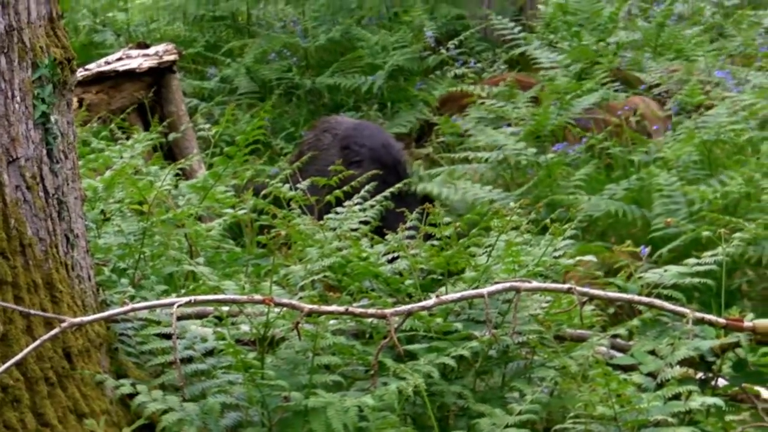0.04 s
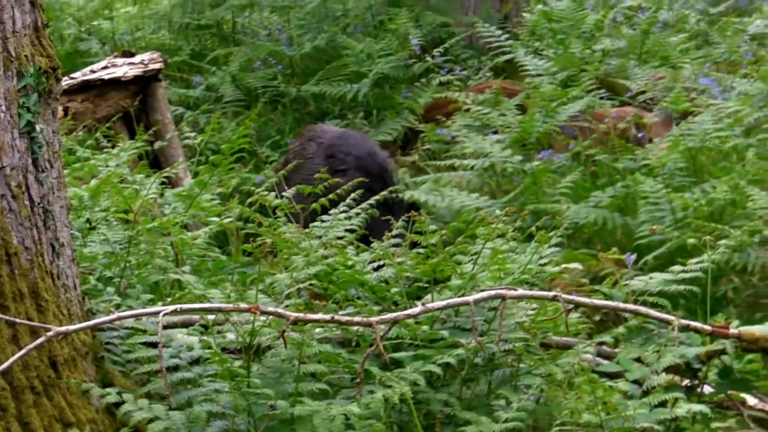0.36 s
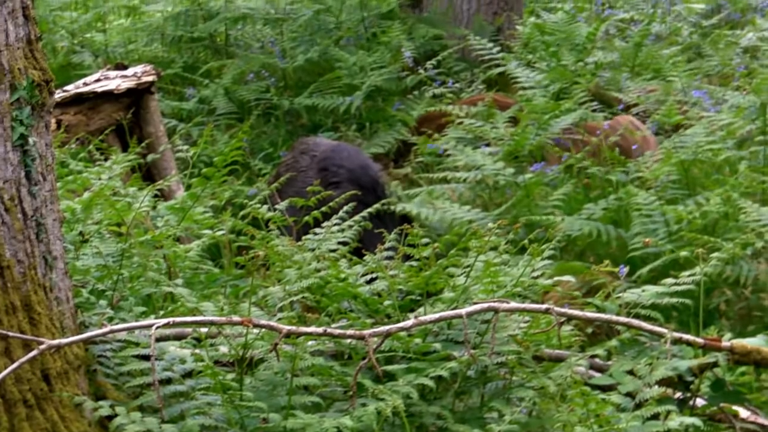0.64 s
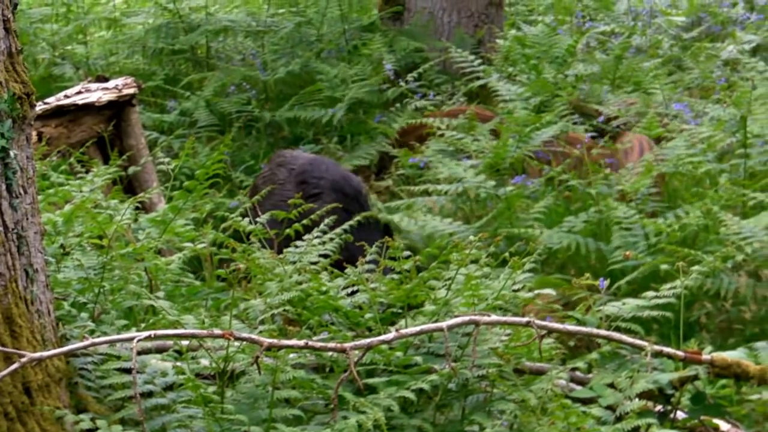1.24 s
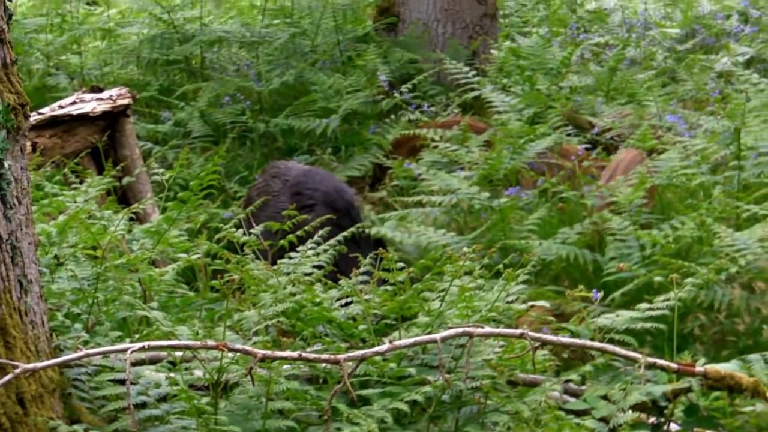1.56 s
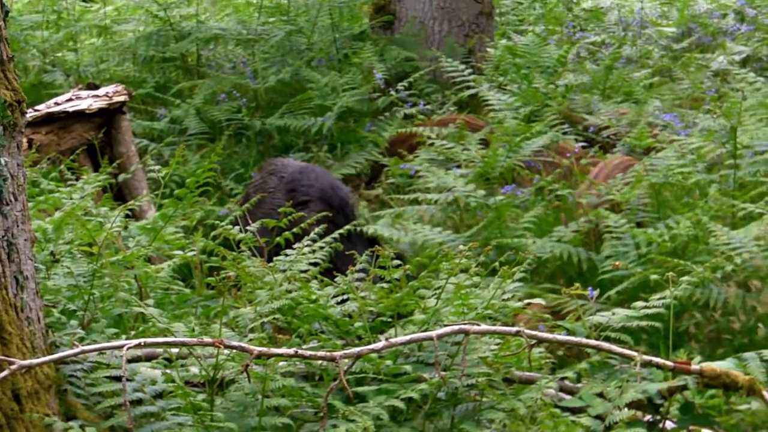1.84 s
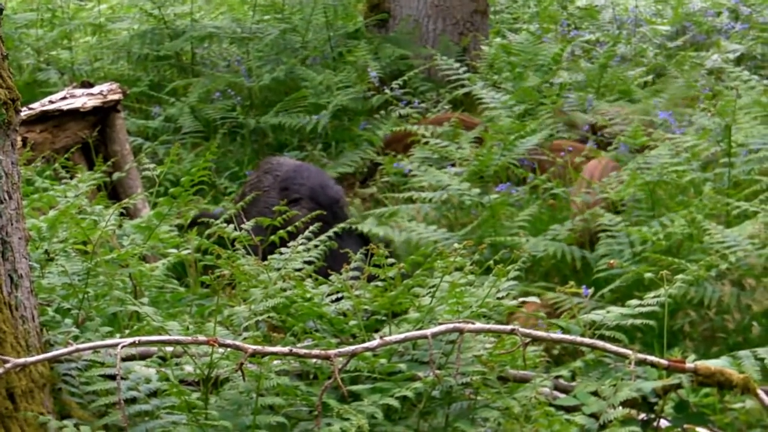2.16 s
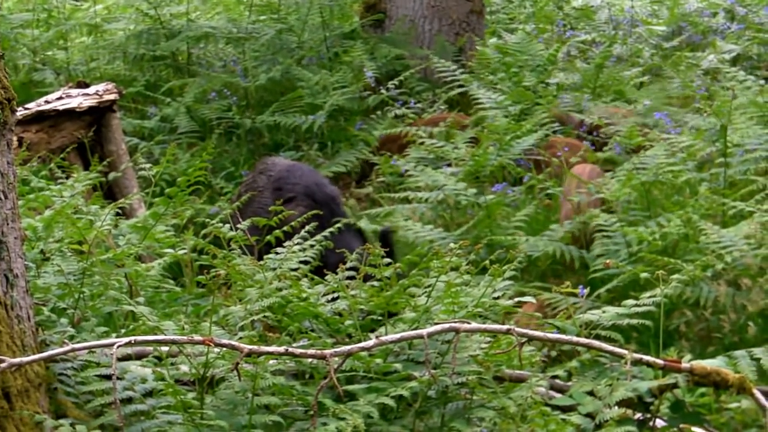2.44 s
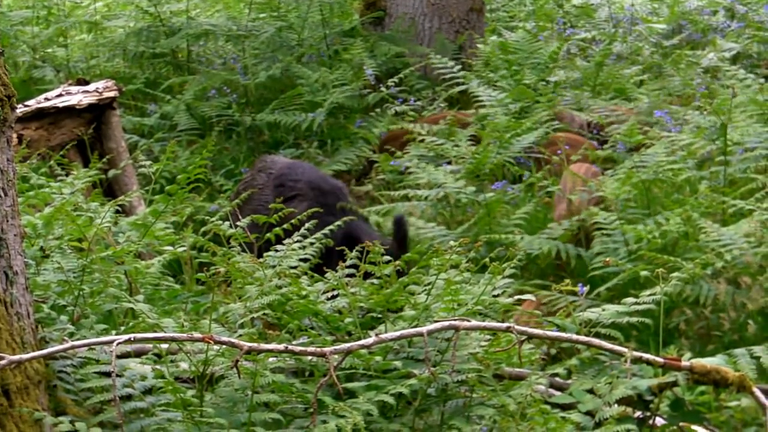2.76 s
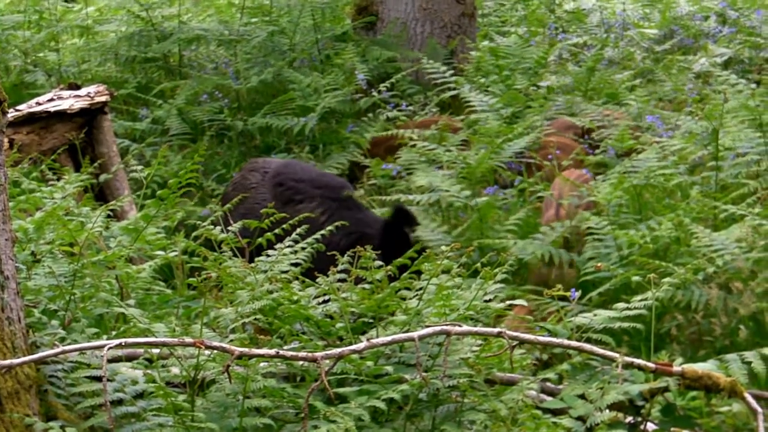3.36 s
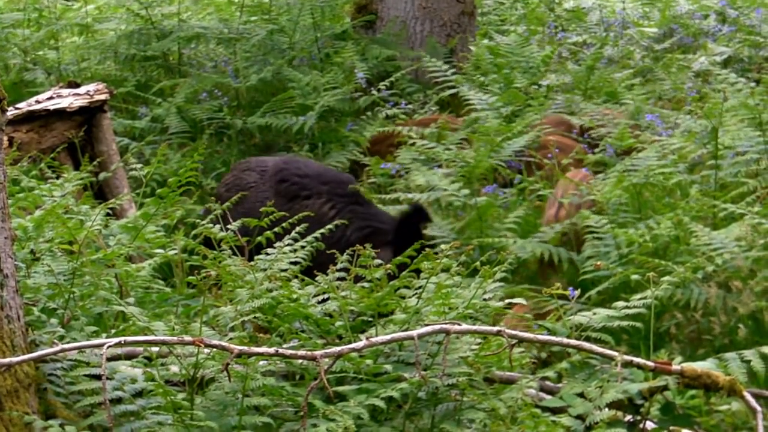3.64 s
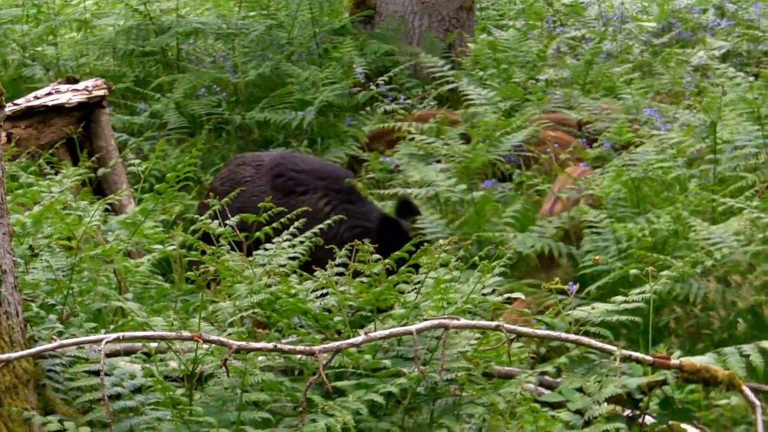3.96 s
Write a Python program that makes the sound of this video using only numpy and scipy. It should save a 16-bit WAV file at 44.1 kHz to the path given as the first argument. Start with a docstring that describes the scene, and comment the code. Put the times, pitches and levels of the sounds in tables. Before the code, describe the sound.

Close rustling of a boar moving through ferns grows more crackly, with snapping stalks, knocked sticks and soft hoof steps. Behind it, thin bird whistles and a few far falling calls echo through quiet, dense woods.

```python
"""A tit's thin high-low whistles and a brushing of ferns, over the soft hush of dense woodland.
Near the microphone a boar pushes through: fronds scrape and crackle, stalks snap, hooves crush
dry litter, knock sticks and thud on the soil. Other birds chirp, a thrush farther off gives four
falling slurs, and the trunks scatter the calls. Early on, the whole sound drops out for an instant."""
import sys
import numpy as np
from scipy import signal
from scipy.fft import rfft, irfft
from scipy.io import wavfile
from scipy.ndimage import uniform_filter1d

SR = 44100
rng = np.random.default_rng(int(sys.argv[2]) if len(sys.argv) > 2 else 0)


def wav_out(sig):
    """Save sig, one row per channel (or a flat mono array), as 16-bit PCM at SR to the path in sys.argv[1]."""
    wavfile.write(sys.argv[1], SR, np.round(np.clip(np.atleast_2d(sig).T, -1, 1) * 32767).astype(np.int16))


N = 176400
T = np.arange(N) / SR
SIDES = np.array([[1], [-1]]) / 2  # shares a difference between left and right


def undb(db):
    """Decibels to gain."""
    return 10 ** (np.asarray(db) / 20)


def unit(x):
    """Scale to rms 1."""
    return x / np.sqrt(np.mean(x ** 2) + 1e-20)


def curve(rows):
    """Straight lines between points in time."""
    return np.interp(T, *np.array(rows).T)


def over_pitch(rows):
    """Straight lines between points on a log-frequency axis."""
    hz, value = np.array(rows).T
    return np.interp(np.log(np.arange(N // 2 + 1) * SR / N + 1e-9), np.log(hz), value)


def colour(x, rows):
    """Minimum-phase filter with the given spectrum: nothing rings ahead of a click."""
    cepstrum = irfft(np.log(undb(over_pitch(rows))), N)
    cepstrum[1:N // 2] *= 2
    cepstrum[N // 2 + 1:] = 0
    return irfft(rfft(x) * np.exp(rfft(cepstrum)), N)


def walk(per_s):
    """Random drift of rms 1, heading for a new value per_s times a second."""
    hold = max(int(SR / per_s), 1)
    return unit(uniform_filter1d(np.repeat(rng.standard_normal(N // hold + 1), hold), hold)[:N])


def trunks(x, t60_s, correlation, onset_s=0.0042):
    """Stems and trunks scatter a sound into a dying stereo echo."""
    noise = rng.standard_normal((3, N)) * np.exp(-np.log(1000) * T / t60_s) * (1 - np.exp(-T / onset_s))
    echo = np.sqrt(correlation) * noise[2] + np.sqrt(1 - correlation) * noise[:2]
    return signal.fftconvolve(np.atleast_2d(x), unit(echo) / np.sqrt(N), axes=1)[:, :N]


def gate(t, length, release_s, attack_s=.018):
    """A whistle's soft attack, hold and fading release."""
    attack = np.sin(np.pi / 2 * np.clip((T - t) / attack_s, 0, 1))
    return attack * np.exp(-np.maximum(T - t - length, 0) / release_s)


def tit(settle_s=0.0175):
    """Thin notes drop quickly onto a held pitch and linger among the trees."""
    # whistles: t/s, length/s, held f/Hz, opening drop/Hz, relative level/dB, L-R/dB, L-R phase/rad
    notes = [(-.02, 0.12, 3880, 54, -54, 4, 0.5), (0.116, 0.049, 5540, 160, -48.5, 7.5, 3),
             (0.328, .07, 3897, 60.1, -52, 2, 4), (1.708, .055, 5310, 210, -45.5, -3, 2.5),
             (1.922, 0.059, 3930, 90, -49, 6.5, 1.5), (2.143, 0.054, 5510, 160, -44, -2, 3.3),
             (2.339, 0.088, 3882, 30, -45, 6, 0), (2.556, 0.065, 5496, 210, -43.5, 4.5, 3.5),
             (2.769, 0.07, 3905, 99, -43.5, 3, 1), (2.981, 0.096, 5614, 60, -50.5, 0, 1),
             (3.176, 0.06, 3945, 60, -54.5, 7, 0.5), (3.265, 0.032, 3940, 20, -50.5, 1, 0.3),
             (3.394, 0.1, 5740, 150, -58.5, 3, 1), (3.58, 0.021, 3875, 45, -50, 7, 1),
             (3.643, 0.024, 3905, 20, -48.5, 8, 1.1)]
    wobble = 1 + .0015 * walk(120)
    flutter = undb(0.17 + 0.5 * walk(70))
    direct = voice = 0
    for t, length, hz, drop, db, pan_db, lead in notes:
        pitch = (hz + drop * np.exp(-np.maximum(T - t, 0) / settle_s)) * wobble
        phase = 2 * np.pi * np.cumsum(pitch) / SR
        level = np.sqrt(2) * undb(db) * flutter * gate(t, length, release_s=0.016)
        direct += level * undb(pan_db * SIDES) * np.sin(phase + lead * SIDES)
        voice += level * np.sin(phase)
    near = undb(-9) * trunks(voice, t60_s=0.48, correlation=0.18)
    far = undb(-8.5) * trunks(voice, t60_s=1.8, correlation=0.52)
    return direct + near + far


def hush():
    """Wide, steady air of the wood all round the microphone, with a hollow low note."""
    # spectrum of the air: f/Hz, relative level/dB
    spectrum = [(18, -27), (40, -16), (70, -7), (130, -5), (200, -6.5), (270, -9.5), (330, -3), (395, 3.5),
                (480, -0.5), (700, -6), (1300, -8), (2400, -8.5), (4000, -11.5), (8000, -16),
                (16000, -25.5)]
    # likeness of left and right: f/Hz, correlation
    likeness = [(30, 0.61), (120, 0.63), (300, 0.086), (500, 0.25), (1200, 0.29), (4000, 0.13),
                (12000, 0.17)]
    correlation = over_pitch(likeness)
    noise = rfft(rng.standard_normal((2, N))) * np.sqrt([1 + correlation, 1 - correlation])
    mid, side = irfft(noise * undb(over_pitch(spectrum)), N)
    return unit(np.array([mid + side, mid - side])) * undb(-53.5 - 0.7 * walk(7.3))


def crackle(spectrum, per_s, spread_db=2.5, fracture_s=0.00042):
    """Tiny fractures, each a very short scratch: mostly faint, a few strong, from scattered directions."""
    strength = undb(spread_db * np.minimum(rng.exponential(size=N), 5))
    fractures = (rng.random(N) < per_s / SR) * strength ** 2
    energy = signal.lfilter([1], [1, -np.exp(-2 / (fracture_s * SR))], fractures + 1e-12)
    scratches = np.sqrt(energy) * rng.standard_normal(N)
    pan = 0.27 * walk(1500)
    return unit(colour(scratches * np.array([1 + pan, 1 - pan]), spectrum))


def treble(x, above_hz=9900):
    """The crisp top of a rustle."""
    return signal.sosfiltfilt(signal.butter(2, above_hz, "highpass", fs=SR, output="sos"), x)


def fronds():
    """Fronds scrape along the boar's flanks as it pushes on; their brightness changes on the way."""
    # spectrum of the ferns: f/Hz, relative level/dB
    spectrum = [(150, -34), (500, -11.5), (1000, -7), (2000, -3), (4500, 0), (6500, -3), (7600, -1),
                (9200, -3), (12200, -9.5), (14000, -10.5), (16000, -16)]
    # strength of the brushing: t/s, relative level/dB
    brushing = [(0, -54.5), (.13, -53.5), (.21, -48), (.41, -52.5), (.47, -66), (.65, -58.5), (.69, -46),
                (.75, -54.5), (.79, -44.5), (.86, -52), (.93, -51), (.99, -58), (1.2, -48), (1.43, -60.5),
                (1.51, -66), (1.57, -54), (1.66, -54.5), (1.73, -48), (1.82, -51.5), (2.2, -47.5),
                (2.45, -51), (2.6, -54), (2.72, -52.5), (2.83, -46.5), (2.9, -48.5), (2.97, -47.5),
                (3.06, -51), (3.13, -49.5), (3.22, -52.5), (3.34, -48.5), (3.55, -51.5), (3.7, -54),
                (3.81, -58), (3.87, -52.5), (3.94, -59), (4, -52.5)]
    # brightness of the brushing: t/s, treble gain/dB
    brightness = [(0, -9), (.4, -4), (.7, -0.5), (1.5, 1), (2.1, -1), (3, 3), (3.6, 1.5), (4, 2)]
    leaves = crackle(spectrum, per_s=3500) * undb(curve(brushing) - 0.83 + .9 * walk(70))
    return leaves + (undb(curve(brightness)) - 1) * treble(leaves)


def glides(rows, rasp):
    """Whistles that bend through three pitches, with a quick quaver."""
    quaver = 1 + rasp * walk(500)
    voice = 0
    for t, length, start, middle, end, db in rows:
        u = np.clip((T - t) / length, 0, 1)
        pitch = start + (end - start) * u + (2 * middle - start - end) * 2 * u * (1 - u)
        level = np.sqrt(2) * undb(db) * gate(t, length, release_s=0.0032)
        voice += level * np.sin(2 * np.pi * np.cumsum(pitch * quaver) / SR)
    return voice


def chirps():
    """Single clean calls of other birds among the trees."""
    # calls: t/s, length/s, start f/Hz, middle f/Hz, end f/Hz, level/dB
    calls = [(.132, 0.062, 1735, 3085, 2150, -44.5), (1.845, 0.023, 3250, 3600, 4200, -55),
             (2.015, 0.031, 2900, 3250, 3700, -54), (2.125, 0.0914, 3790, 3588, 3570, -49)]
    voice = glides(calls, rasp=0.0033)
    return voice + undb(-2) * trunks(voice, t60_s=0.65, correlation=0.84)


def thrush(scoop_s=.06, scoop_from_hz=2250, scoop_db=-8.5):
    """Far slurs, each entered by a quiet upward scoop; more echo than voice reaches the microphone."""
    # falling slurs: t/s, length/s, start f/Hz, middle f/Hz, end f/Hz, relative level/dB
    slurs = [(.52, 0.067, 2850, 2500, 2212, -43.5), (0.851, 0.079, 2615, 2431, 2127, -46),
             (1.167, .085, 2984, 2691, 2293, -43.5), (1.5, 0.087, 2923, 2614, 2208, -43.5)]
    scoops = [(t - scoop_s, scoop_s, scoop_from_hz, (scoop_from_hz + middle) / 2, start, db + scoop_db)
              for t, _, start, middle, _, db in slurs]
    voice = undb(-8) * glides(scoops + list(slurs), rasp=0.0401)
    near = undb(5) * trunks(voice, t60_s=0.16, correlation=0.89)
    far = undb(4.5) * trunks(voice, t60_s=1.35, correlation=0.76)
    return voice + near + far


def bursts(rows, decay_s, width_oct, left_db, size=4096):
    """Short bursts of noise, each ringing around the pitch of the thing that gives way."""
    out = np.zeros((2, N + size))
    hz = np.arange(1, size // 2 + 2) * SR / size
    fade = np.exp(-T[:size] / decay_s)
    for t, db, centre_hz in rows:
        band = np.exp(-.5 * (np.log2(hz / centre_hz) / width_oct) ** 2)
        ring = irfft(rfft(rng.standard_normal(size)) * band)
        burst = unit(ring * fade) * np.sqrt(np.mean(fade ** 2))
        pan_db = left_db + rng.standard_normal()
        at = int(t * SR)
        out[:, at:at + size] += undb(db + pan_db * SIDES) * burst
    return out[:, :N]


def snaps():
    """Stalks break with a bright crack, a little left of the microphone."""
    # breaking stalks: t/s, relative level/dB, centre f/Hz
    stalks = [(.7657, -42, 6000), (.835, -50, 5000), (1.1463, -36.5, 4000), (1.701, -32, 6000),
              (1.7529, -30, 4900), (1.907, -37, 7000), (2.0318, -33.5, 5500), (2.0612, -38, 7000),
              (2.2029, -33, 5970), (2.2262, -33, 7440), (2.7666, -27, 5450), (2.7905, -27, 3200),
              (2.9527, -36, 7000), (3.019, -35, 5000), (3.1083, -33, 6400), (3.114, -35.5, 7000),
              (3.3059, -36, 5500), (3.354, -33, 5500), (3.378, -37, 6000), (3.4012, -36, 6000),
              (3.4331, -34, 7460), (3.8407, -36, 7000)]
    return undb(-6) * bursts(stalks, decay_s=0.0029, width_oct=0.77, left_db=2.5)


def steps():
    """Each hoof presses a swelling burst of crackle out of the litter, crisper where it is dry."""
    # spectrum of the litter: f/Hz, relative level/dB
    spectrum = [(150, -20.5), (500, -5), (1000, -7), (2000, 1.5), (3000, -2), (4500, 2.5), (6500, 0),
                (9000, 0.5), (12000, -11), (14000, -6.5), (16000, -10.5)]
    # hoof falls: peak t/s, rise/s, decay/s, relative level/dB, treble gain/dB
    hooves = [(1.703, 0.011, 0.015, -41, 1.5), (2.063, .013, 0.0053, -44.5, 4.5),
              (2.144, 0.03, 0.04, -41.5, 2), (2.336, 0.027, 0.022, -48, 3.5),
              (2.768, 0.016, 0.0085, -39.5, 0), (2.795, 0.0057, 0.016, -47, -2),
              (3.35, 0.014, 0.011, -40, -2), (3.731, 0.015, 0.021, -43.5, 3.5)]
    litter = undb(2.5) * crackle(spectrum, per_s=6000)
    top = treble(litter)
    out = 0
    for t, rise, decay, db, crisp_db in hooves:
        pressure = np.exp(-np.maximum((t - T) / rise, (T - t) / decay))
        out += undb(db) * pressure * (litter + (undb(crisp_db) - 1) * top)
    return out


def thuds():
    """The boar's weight lands softly on the soil."""
    # treads: t/s, relative level/dB, centre f/Hz
    treads = [(2.11, -57, 100), (2.395, -58, 115), (3.115, -57.5, 129), (3.615, -60, 100)]
    return undb(-2) * bursts(treads, decay_s=.022, width_oct=0.41, left_db=1)


def knocks():
    """Sticks knocked underfoot ring briefly in a narrow band."""
    # struck sticks: t/s, relative level/dB, ring f/Hz
    sticks = [(2.139, -42, 1670), (2.434, -41, 2890), (2.489, -46.5, 426), (2.495, -43, 850),
              (2.772, -47, 1200), (2.792, -48, 1170), (2.806, -43, 1720), (3.252, -44, 1870),
              (3.976, -51.5, 1780)]
    return undb(-3.5) * bursts(sticks, decay_s=0.0095, width_oct=0.13, left_db=.8)


def scene():
    """The boar close by in the undergrowth, the birds and the air of the wood around it."""
    boar = snaps() + knocks() + thuds() + fronds() + steps()
    leaf_echo = undb(-8) * trunks(boar, t60_s=0.22, correlation=0.12)
    return boar + leaf_echo + tit() + thrush() + chirps() + hush()


def record(dry):
    """A narrow notch in the treble, a brief dropout and a steep top cut."""
    # the sound drops out: t/s, gain/dB
    dropout = [(.418, 0), (.422, -13), (.44, -21), (.45, -40), (.46, -40), (.463, 0)]
    notch_hz, top_hz = 7950, 15500
    notch = signal.butter(2, [notch_hz - 110, notch_hz + 110], "bandstop", fs=SR, output="sos")
    top_cut = signal.ellip(10, .2, 70, top_hz, fs=SR, output="sos")
    return signal.sosfilt(top_cut, signal.sosfilt(notch, dry) * undb(curve(dropout)))


dry = scene()
out = record(dry)
wav_out(out)
```